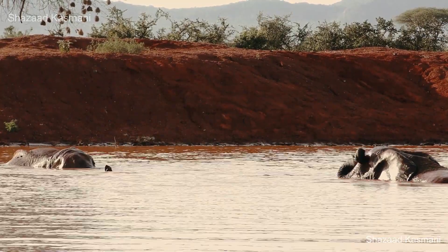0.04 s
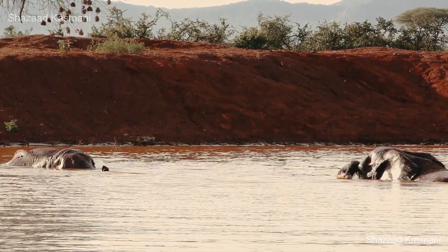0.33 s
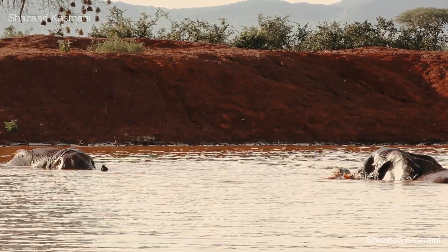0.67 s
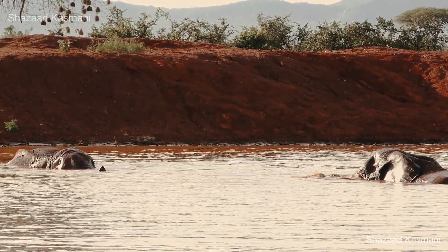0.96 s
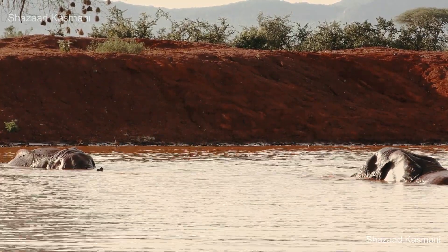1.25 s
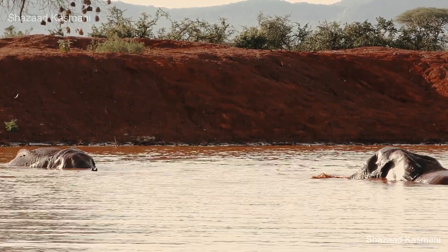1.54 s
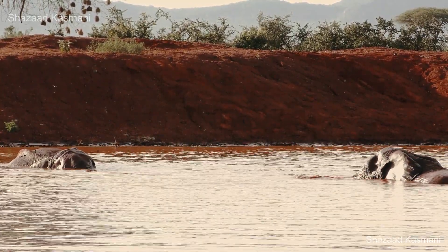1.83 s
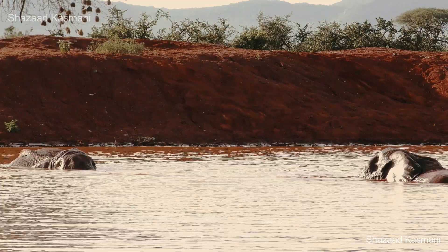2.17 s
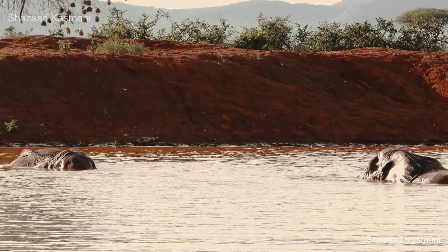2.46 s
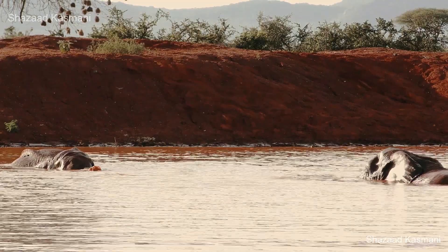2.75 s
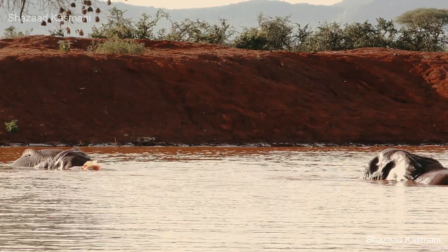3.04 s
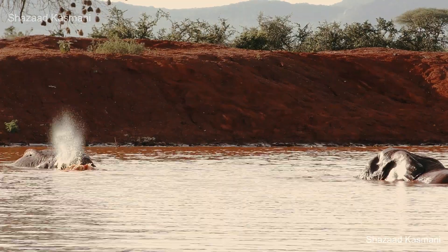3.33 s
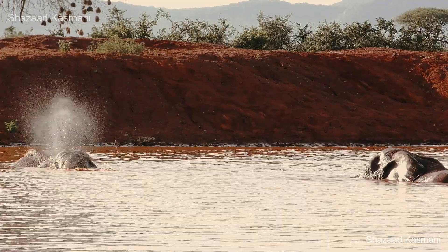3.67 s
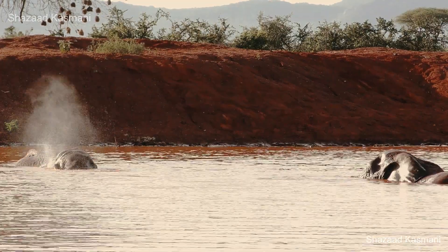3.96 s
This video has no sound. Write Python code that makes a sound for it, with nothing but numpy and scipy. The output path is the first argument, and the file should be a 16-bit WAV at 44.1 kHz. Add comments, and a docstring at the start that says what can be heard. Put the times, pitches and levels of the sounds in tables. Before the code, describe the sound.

Soft sloshing and gurgling come from elephants in a pond at a distance, ending in a bubbling trunk blow and falling spray, with dry clicks near the microphone. Short bird chirps and faint insects sound in the open air.

```python
"""Two elephants wallow in a waterhole some way off, over a steady outdoor hush with faint insects.
From the start a bird gives a sharp falling chip once a second. From 0.6 s water laps, splats and glugs;
small birds call faintly between 1.4 and 3 s. At 3.3 s a trunk blows under water: a rising burble,
a jet, then spray. While the spray comes down, something close by clicks and rustles."""
import sys
import numpy as np
from scipy import signal
from scipy.fft import rfft, irfft
from scipy.io import wavfile
from scipy.ndimage import uniform_filter1d

SR = 44100
rng = np.random.default_rng(int(sys.argv[2]) if len(sys.argv) > 2 else 0)


def transcribe(signal):
    """Save signal, clipped to [-1, 1], as a 16-bit WAV file at the path in sys.argv[1]."""
    frames = np.atleast_2d(signal).T
    limited = np.clip(frames, -1, 1)
    pcm = np.round(limited * 32767).astype(np.int16)
    wavfile.write(sys.argv[1], SR, pcm)


N = 176400
TIME_S = np.arange(N) / SR
FRAME_S, BIN_HZ = np.arange(N // 256 + 5) * 256 / SR, np.fft.rfftfreq(1024, 1 / SR)

# Stereo image of water and clicks. Each row: frequency in Hz, left-right coherence from 0 to 1.
COHERENCE = [(60, 0.32), (400, 0.9), (1400, 0.94), (3000, 0.72), (7000, 1), (15000, 0.33)]


def amp(db):
    """Decibels to gain."""
    return 10 ** (np.asarray(db) / 20)


def unit(x):
    """Scale to rms 1."""
    return x / np.sqrt(np.mean(x ** 2) + 1e-20)


def read(points, hz):
    """Interpolate a spectrum on a log-frequency axis."""
    point_hz, value = np.transpose(points)
    return np.interp(np.log(hz + 1e-6), np.log(point_hz), value)


def curve(rows, t, column=1):
    """Interpolate one column of a time curve."""
    rows = np.array(rows)
    return np.interp(t, rows[:, 0], rows[:, column])


def pan(db):
    """Left and right gains for a level difference."""
    return amp([[db / 2], [-db / 2]])


def add(mix, start_s, sound):
    """Mix a sound in, cropped at both ends of the mix."""
    at = round(start_s * SR)
    sound = sound[..., max(-at, 0):]
    part = mix[..., max(at, 0):][..., :sound.shape[-1]]
    part += sound[..., :part.shape[-1]]


def widen(pair, coherence):
    """Left and right of given coherence from two unrelated signals."""
    coherence = np.clip(coherence, 0, 1)
    mid, side = pair[0] * np.sqrt((1 + coherence) / 2), pair[1] * np.sqrt((1 - coherence) / 2)
    return np.array([mid + side, mid - side])


def colour(pair, tone, cut_db_per_oct=0):
    """Give stereo noise a spectrum and a treble slope; rms 1."""
    hz = np.fft.rfftfreq(pair.shape[1], 1 / SR)
    gain = amp(read(tone, hz) - cut_db_per_oct * np.log2(hz / 1000 + 1))
    return unit(irfft(widen(rfft(pair), read(COHERENCE, hz)) * gain, pair.shape[1]))


def band(size, centre_hz, width_hz):
    """Narrow-band noise."""
    hz = np.fft.rfftfreq(size, 1 / SR)
    bell = np.exp(-2 * ((hz - centre_hz) / width_hz) ** 2)
    return unit(irfft(rfft(rng.standard_normal(size)) * bell, size))


def wash(shape_db, patchy_db, flicker_db, coherence=COHERENCE):
    """Shaped stereo noise with drifting spectral patches and a broadband flicker."""
    noise = rng.standard_normal((5, len(FRAME_S), len(BIN_HZ)))
    patches = unit(uniform_filter1d(uniform_filter1d(noise[4], size=6, axis=0), size=9, axis=1))
    flicker = unit(uniform_filter1d(rng.standard_normal(len(FRAME_S)), size=4))[:, None]
    frames = widen(noise[:2] + 1j * noise[2:4], read(coherence, BIN_HZ))
    frames *= amp(shape_db + patchy_db * patches + flicker_db * flicker)
    return unit(signal.istft(frames.swapaxes(1, 2), nperseg=1024, noverlap=768)[1][:, :N])


def drops(tone, per_s, spread_db=3):
    """Small drops of uneven size, each a noise burst with a 1 ms decay."""
    sizes = amp(spread_db * np.minimum(rng.exponential(1, N), 4))
    hits = rng.random(N) < per_s / SR
    envelope = signal.lfilter([1], [1, -np.exp(-1000 / SR)], sizes * hits)
    return colour(envelope * rng.standard_normal((2, N)), tone)


def echoes(x, wet_db, tail_t60_s=.23, early_decay_s=.0093):
    """A source plus scattered returns from bank and bushes."""
    t = np.arange(SR // 2) / SR
    taps = rng.standard_normal((2, len(t))) * (rng.random((2, len(t))) < .05) * (t > .002)
    taps *= amp(-60 * t / tail_t60_s) + 5.9 * np.exp(-t / early_decay_s)
    taps /= np.linalg.norm(taps, axis=1, keepdims=True)
    return x + amp(wet_db) * signal.fftconvolve(x[None], widen(taps, .64), axes=1)[:, :N]


def air():
    """Steady outdoor hush with a low, wavering hum."""
    # Hush spectrum. Each row: frequency in Hz, level in dB.
    tone = [(15, -37), (25, -9.5), (82, -0.5), (174, -10), (200, -10), (449, -15.5), (542, -20.5),
            (672, -19.5), (812, -30), (905, -14.5), (1250, -16), (1980, -16.5), (3390, -22), (5670, -30.5),
            (7030, -30.5), (8270, -31), (15800, -27)]
    # Hush stereo image. Each row: frequency in Hz, left-right coherence from 0 to 1.
    coherence = [(25, 0.49), (80, 0.54), (400, 0.35), (2000, 0.27), (5000, 0.29), (9000, 0.9),
                 (15000, 0.15)]
    hush = amp(-41) * wash(read(tone, BIN_HZ), patchy_db=.5, flicker_db=1.27, coherence=coherence)
    return hush + amp(-52) * band(N, centre_hz=94.7, width_hz=5.8)


def insects(pip_s=.003, pip_spacing_s=.0085, sweep=.09, scatter=.02):
    """Trains of chirps, each three uneven falling pips, and thin buzzes."""
    # Chirp trains. Each row: start, end and period in seconds, pitch in Hz, level in dB.
    trains = [(0.016, 0.117, 0.072, 6670, -45.5), (0.735, 1.335, 0.058, 7050, -52),
              (1.778, 2.596, .0573, 6730, -46.5), (2.614, 3.118, 0.056, 6900, -53.5)]
    # Buzzes. Each row: start and length in seconds, pitch in Hz, level in dB.
    buzzes = [(.46, 0.21, 7140, -58.5), (1.052, 0.26, 7300, -64), (1.378, 0.27, 7120, -60.5),
              (2.049, 0.34, 7250, -63), (2.383, 0.21, 7140, -58), (3.18, .25, 7280, -68)]
    out, progress = np.zeros(N), np.linspace(0, 1, round(pip_s * SR))
    for start_s, end_s, period_s, hz, db in trains:
        for chirp_s in np.arange(start_s, end_s, period_s):
            chirp_db = db - 3 * (2 * (chirp_s - start_s) / (end_s - start_s) - 1) ** 2  # softer ends
            for k, (late, sharp, loud) in enumerate(rng.standard_normal((3, 3))):
                pitch_hz = hz * (1 + scatter * sharp + sweep * (1 - 2 * progress))
                pip = np.sqrt(2) * np.sin(np.pi * progress) * np.sin(2 * np.pi * np.cumsum(pitch_hz) / SR)
                add(out, chirp_s + pip_spacing_s * (k + late / 10), amp(chirp_db + 2 * loud) * pip)
    for start_s, length_s, hz, db in buzzes:
        swell = np.sqrt(np.hanning(round(length_s * SR)))
        add(out, start_s, amp(db) * swell * band(SR, hz, width_hz=360)[:len(swell)])
    return echoes(out, wet_db=-6)


def small_birds(warble_depth=.008, flutter_db=3):
    """Faint, ragged, gliding whistles from the bushes."""
    # Whistles. Each row: start and length in seconds, start, middle and end pitch in Hz, level in dB.
    notes = [(1.37, .07, 4100, 4400, 4050, -58), (1.509, 0.1, 2900, 3270, 4210, -59),
             (1.605, .06, 4100, 4340, 4380, -59), (1.81, 0.12, 3150, 3510, 4310, -56.5),
             (1.893, 0.067, 4150, 4506, 4230, -58), (1.582, .018, 6800, 6100, 5450, -56),
             (1.77, 0.062, 6100, 5900, 5330, -66), (2.202, .01, 3620, 5000, 6300, -53),
             (2.214, .011, 3630, 4270, 3800, -45.5), (2.231, 0.0126, 3900, 5160, 4900, -45),
             (2.242, .014, 4900, 5670, 5430, -50), (2.256, .013, 5270, 4710, 3940, -43),
             (2.734, 0.015, 3940, 3470, 3200, -51), (2.745, 0.03, 4700, 5190, 4800, -61)]
    out = np.zeros(N)
    for start_s, length_s, *pitches_hz, db in notes:
        progress = np.linspace(0, 1, round(length_s * SR))
        wander = unit(uniform_filter1d(rng.standard_normal((2, SR // 4)), size=90, axis=1))
        warble, flutter = wander[:, :len(progress)]
        glide_hz = np.polyval(np.polyfit([0, .5, 1], pitches_hz, 2), progress)
        phase = 2 * np.pi * np.cumsum(glide_hz * (1 + warble_depth * warble)) / SR
        envelope = np.sqrt(abs(np.sin(np.pi * progress))) * amp(flutter_db * flutter)
        add(out, start_s, amp(db) * unit(envelope * np.sin(phase)))
    return echoes(out, wet_db=-7)


def bird_squeak(start_s=2.918, length_s=.0275, peak_hz=2810, bend=.07):
    """One thin, arched bird call, rich in overtones."""
    # Levels of harmonics 1 to 4 in dB.
    harmonics_db = [-50, -56, -50, -57]
    out, arch = np.zeros(N), np.sin(np.linspace(0, np.pi, round(length_s * SR)))
    phase = 2 * np.pi * np.cumsum(peak_hz * (1 - bend * (1 - arch))) / SR
    add(out, start_s, arch * sum(amp(db) * np.sin(k * phase) for k, db in enumerate(harmonics_db, 1)))
    return echoes(out, wet_db=-2)


def bird_chips(length_s=.031, fade_s=.0016):
    """A bird whips one pure tone down by more than an octave; the level peaks twice."""
    # Chips. Each row: start in seconds, level at the top and base level for the mid-sweep in dB.
    chips = [(-.024, -27, -22), (0.966, -31.5, -25), (1.987, -30, -22.5), (3.035, -25, -24.5),
             (3.988, -20.5, -23)]
    # Sweep. Each row: time into the chip in seconds, pitch in Hz.
    sweep = [(0, 3280), (.006, 2980), (.0125, 2123), (.019, 1700), (.03, 1400)]
    out, t = np.zeros(N), np.arange(0, length_s, 1 / SR)
    whistle = np.sqrt(2) * np.sin(2 * np.pi * np.cumsum(curve(sweep, t)) / SR)
    gate = np.clip(np.minimum(t, length_s - t) / fade_s, 0, 1)
    for start_s, top_db, mid_db in chips:
        level_db = curve([(.0055, top_db), (.008, mid_db - 10), (.0105, mid_db - 5),
                          (.0135, mid_db - 1.5), (.017, mid_db - 9.5), (.03, mid_db - 16)], t)
        add(out, start_s, amp(level_db) * gate * whistle)
    return pan(.35) * echoes(out, wet_db=-7)


def clicks(rise_s=.001, hold_s=.003, rustle_db=-17, rustle_decay_s=.016, grit_db=.6, ring_db=-24):
    """Dry, gritty clicks close by, each with a short rustle and a faint ring."""
    # Clicks. Each row: start in seconds, level in dB, decay in seconds, treble cut in dB per octave
    # (negative brightens), treble limit in Hz, left minus right in dB.
    events = [(.364, -41, 0.0029, -2, 9020, -2), (3.7009, -26, .002, -5.5, 16000, 6.5),
              (3.709, -33.5, 0.0086, -8, 10000, 0), (3.7505, -28.5, 0.0033, -3, 11000, 6),
              (3.7645, -21.5, 0.0045, -1.5, 16000, 9), (3.7886, -25, 0.0044, -6.5, 14000, 2),
              (3.802, -30.5, 0.0094, -5, 10000, 9), (3.811, -31.5, 0.0038, -6, 10000, 11),
              (3.82, -28, 0.0071, -7.5, 9000, 5), (3.834, -34, 0.0054, -9.5, 9000, 3),
              (3.9038, -25.5, 0.0021, -4, 15000, 9), (3.912, -36, .008, -10.5, 9000, -1),
              (3.954, -30, 0.0033, -4, 11000, 11), (3.967, -20.5, 0.0056, -2, 15000, 7.5),
              (3.9922, -25.5, .002, -7, 15000, 7)]
    # Click spectrum. Each row: frequency in Hz, level in dB.
    tone = [(100, -11), (700, -29), (1150, 5), (2000, 9.5), (2700, 7), (4000, -7.5), (5000, -8),
            (6500, -10.5), (9500, -11.5), (12000, -16), (15500, -29)]
    # Ringing modes. Each row: frequency in Hz, level in dB, T60 in seconds.
    modes = [(1240, -1, .12), (1890, 0, .1), (2140, -1, .1), (2525, 0, .2), (2688, 1, .16), (4355, -12, .1),
             (5720, -13, .12)]
    out, t = np.zeros((2, N)), np.arange(6000) / SR
    for start_s, level_db, decay_s, cut_db_per_oct, limit_hz, side_db in events:
        limited_tone = [(hz, db - 10 * np.log10(1 + (hz / limit_hz) ** 10)) for hz, db in tone]
        rise = np.minimum(t / rise_s, 1)
        snap = np.exp(-np.maximum(t - hold_s, 0) / decay_s)
        envelope = rise * (snap + amp(rustle_db) * np.exp(-t / rustle_decay_s))
        grit = rng.standard_normal((2, len(t)))
        grit *= amp(grit_db * np.repeat(rng.standard_normal(len(t) // 20), 20))
        burst = unit(colour(grit, limited_tone, cut_db_per_oct) * envelope)
        burst *= np.sqrt(np.mean(envelope ** 2))
        ring = sum(amp(db - 60 * t / t60_s) * np.sin(2 * np.pi * (hz * t + rng.random()))
                   for hz, db, t60_s in modes)
        add(out, start_s, pan(side_db) * amp(level_db) * (burst + amp(ring_db) * rise * ring))
    return out


def gurgle():
    """Air and water churn under the surface: a low, flickering rumble."""
    # Envelope. Each row: time in seconds, level in dB.
    levels = [(1.2, -58), (1.36, -45.5), (1.48, -53), (1.61, -54), (1.69, -50), (1.74, -52), (1.82, -48),
              (2.0, -49.5), (2.3, -53), (2.45, -60)]
    # Spectrum. Each row: frequency in Hz, level in dB.
    tone = [(60, -30), (150, 2), (230, -3), (310, -5.5), (420, 1), (500, -18), (600, -26), (1500, -28),
            (5000, -66)]
    return amp(curve(levels, TIME_S)) * wash(read(tone, BIN_HZ), patchy_db=4.5, flicker_db=-1.5)


def lapping():
    """Water slops and trickles off the animals."""
    # Envelope. Each row: time in seconds, level in dB.
    levels = [(0, -58), (.55, -55), (.6, -41.5), (.69, -39.5), (.74, -42.5), (.82, -40.5), (.87, -47),
              (1.02, -38.5), (1.2, -43.5), (1.3, -51.5), (1.5, -46.5), (1.69, -43.5), (1.75, -41),
              (1.9, -44), (2.05, -44.5), (2.4, -50.5), (2.85, -50.5), (3.1, -43), (3.27, -47)]
    # Spectrum. Each row: frequency in Hz, level in dB.
    tone = [(40, -23), (150, 2.5), (400, 1.5), (560, -8.5), (800, -16), (1050, 2), (1600, -2.5),
            (2700, -5.5), (4200, -18), (8000, -33), (15000, -32)]
    slop = wash(read(tone, BIN_HZ), patchy_db=3.5, flicker_db=1)
    trickle = amp(-5) * drops(tone, per_s=170)
    return amp(curve(levels, TIME_S)) * unit(slop + trickle)


def bubbles():
    """Big bubbles boom softly, gliding up as they near the surface."""
    # Bubbles. Each row: start in seconds, level in dB, start and end pitch in Hz, length in seconds.
    events = [(.651, -33, 125, 332, 0.037), (0.664, -36, 250, 350, 0.017), (0.814, -36, 290, 370, 0.013),
              (2.835, -36.5, 165, 329, .045), (2.982, -41.5, 130, 330, .07), (3.15, -42.5, 159, 274, .036),
              (3.298, -34, 130, 220, 0.021), (3.316, -39.5, 220, 322, .035), (3.396, -35, 140, 230, 0.061),
              (3.435, -41, 293, 450, 0.056), (3.535, -35, 297, 307, .05)]
    out = np.zeros(N)
    for start_s, db, start_hz, end_hz, length_s in events:
        progress = np.linspace(0, 1, round(length_s * SR))
        phase = 2 * np.pi * np.cumsum(start_hz * (end_hz / start_hz) ** progress) / SR
        add(out, start_s, amp(db) * np.sqrt(2) * np.sin(np.pi * progress) * np.sin(phase))
    return echoes(out, wet_db=-16)


def glugs(rise_s=.003, fall_s=.0028, lead_s=.02):
    """Air pockets break the surface: hollow, low bursts that start and stop abruptly."""
    # Glugs. Each row: start in seconds, level in dB, length in seconds.
    events = [(.664, -36, 0.02), (.772, -38, 0.014), (0.809, -38, 0.019), (1.384, -40, .02),
              (1.424, -38.5, .014), (1.495, -35, 0.021), (1.538, -35.5, .019), (1.582, -35.5, .022),
              (1.64, -38, 0.017), (1.666, -38, 0.025), (1.77, -32, 0.02), (1.8, -36, 0.0087),
              (1.819, -39, 0.016), (1.863, -43, .01), (1.887, -38, 0.014), (1.92, -39, .012),
              (2.096, -33.5, 0.0075), (2.11, -41.5, .01), (2.253, -43, 0.01)]
    # Hollow spectrum. Each row: frequency in Hz, level in dB.
    tone = [(40, -24), (110, -8), (170, 2.5), (240, 3.5), (320, -4), (420, 2), (500, -7), (590, -25),
            (800, -24), (1100, -19), (2000, -26), (5000, -60)]
    out, t = np.zeros((2, N)), np.arange(8192) / SR - lead_s
    for start_s, db, length_s in events:
        envelope = np.clip(t / rise_s, 0, 1) * np.exp(-np.maximum(t - length_s, 0) / fall_s)
        burst = colour(rng.standard_normal((2, len(t))) * envelope, tone)
        add(out, start_s - lead_s, amp(db) * burst * np.sqrt(np.mean(envelope ** 2)))
    return out


def splats(rise_s=.001, lead_s=.01, notch_hz=740, notch_q=1.3):
    """Water smacks on water and wet hide; the reflection off the pond hollows the low middle."""
    # Splats. Each row: start in seconds, level in dB, decay in seconds, centre in Hz, relative width.
    events = [(0.136, -40.5, 0.014, 2400, 1), (0.564, -23.5, 0.0027, 2490, 1.84),
              (0.568, -41.5, 0.049, 3500, 2), (0.633, -40.5, 0.04, 2860, 1.3),
              (0.684, -28.5, 0.0054, 1080, 0.58), (.7, -33, .004, 1500, .8), (.77, -37, .006, 1100, .6),
              (0.8112, -27, 0.0025, 1500, 1.5), (.843, -32, 0.0043, 1300, 0.72),
              (1.66, -38.5, 0.045, 2700, 1.03), (1.888, -32.5, 0.023, 850, 1.3),
              (2.635, -37, 0.024, 1170, 0.83), (2.684, -43, .012, 2770, 0.69),
              (2.951, -39, 0.0092, 1300, .5), (3.09, -40, 0.0056, 3000, 1)]
    # Spectrum at width 1. Each row: multiple of the centre, level in dB.
    peak_shape = [(.08, 1), (.3, -3.5), (.5, 1), (1, 10), (1.5, 1), (2.3, -16), (4, -30), (12, -42)]
    out, t = np.zeros((2, N)), np.arange(8192) / SR - lead_s
    for start_s, level_db, decay_s, centre_hz, width in events:
        envelope = np.clip(t / rise_s, 0, 1) * np.exp(-np.maximum(t - rise_s, 0) / decay_s)
        tone = [(ratio ** width * centre_hz, db) for ratio, db in peak_shape]
        burst = colour(rng.standard_normal((2, len(t))) * envelope, tone)
        add(out, start_s - lead_s, amp(level_db) * burst * np.sqrt(np.mean(envelope ** 2)))
    return signal.lfilter(*signal.iirnotch(notch_hz, notch_q, SR), out)


def trunk_blow():
    """Air from the trunk burbles up, then breaks out of the pond in a jet that swells and brightens."""
    # Burble and jet over time. Each row: time in seconds, level in dB, centre in Hz.
    burble = [(3.28, -53, 170), (3.34, -39, 200), (3.43, -36.5, 240), (3.5, -39, 270), (3.58, -42, 292),
              (3.72, -38.5, 254), (3.85, -43.5, 247), (4, -41, 263)]
    jet = [(3.33, -58, 1200), (3.44, -44, 1500), (3.51, -42, 1800), (3.55, -38.5, 2000), (3.62, -40, 2500),
           (3.66, -57, 2400), (3.75, -62, 2300)]
    # Their spectra. Each row: multiple of the centre, level in dB.
    burble_tone = [(.2, -17), (.6, -5.5), (1, -3), (1.6, -4), (2.3, -15.5), (3.3, -26.5), (8, -59)]
    jet_tone = [(.25, -33), (.55, -5.5), (1, -2), (1.5, -5.5), (2.3, -19), (6, -43)]
    out = np.zeros((2, N))
    for course, tone in (burble, burble_tone), (jet, jet_tone):
        centre_hz = curve(course, FRAME_S, column=2)[:, None]
        rush = wash(read(tone, BIN_HZ / centre_hz), patchy_db=1, flicker_db=1)
        out += amp(curve(course, TIME_S)) * rush
    return out


def spray():
    """Water blown up by the trunk comes down as mist and drops."""
    # Envelope. Each row: time in seconds, level in dB.
    levels = [(3.28, -77), (3.36, -44.5), (3.46, -43), (3.55, -36.5), (3.62, -36.5), (3.68, -36.5),
              (3.76, -33), (3.83, -38), (3.87, -42), (3.93, -34.5), (4, -35)]
    # Spectrum. Each row: frequency in Hz, level in dB.
    tone = [(200, -41), (550, -10), (780, -11), (1150, 2.5), (1700, -5.5), (2600, -3), (3600, -9.5),
            (5500, -21.5), (9000, -24), (15000, -31)]
    mist = wash(read(tone, BIN_HZ), patchy_db=2.2, flicker_db=1)
    patter = amp(-6.5) * drops(tone, per_s=670)
    return pan(2.3) * amp(curve(levels, TIME_S)) * unit(mist + patter)


def scene():
    """Stereo sum of the waterhole and its surroundings."""
    water = glugs() + gurgle() + bubbles() + splats() + lapping() + trunk_blow() + spray()
    return air() + water + clicks() + bird_chips() + small_birds() + bird_squeak() + insects()


def record(dry):
    """Steep low-pass at 15950 Hz."""
    lowpass = signal.firwin(511, 15950, window=("kaiser", 9), fs=SR)
    return signal.oaconvolve(dry, lowpass[None], "same")


dry = scene()
out = record(dry)
transcribe(out)
```